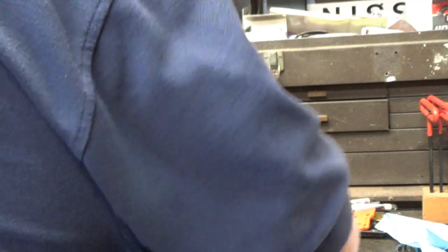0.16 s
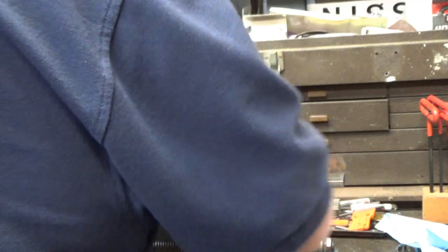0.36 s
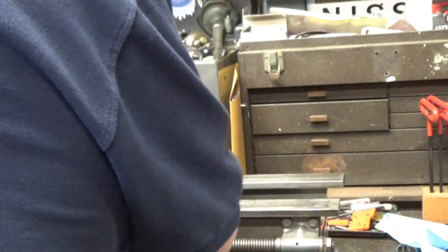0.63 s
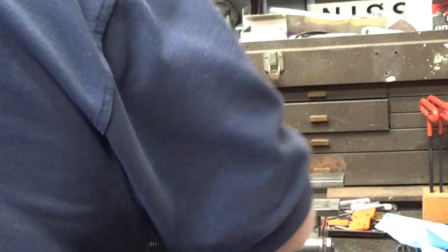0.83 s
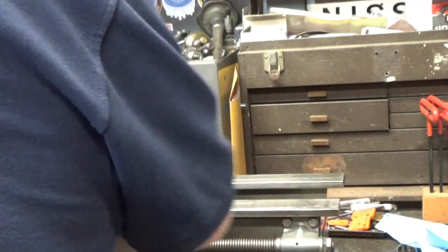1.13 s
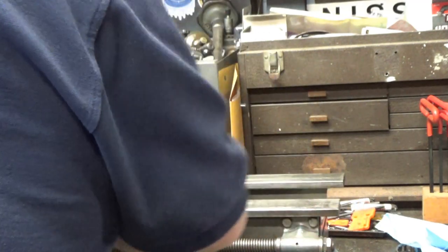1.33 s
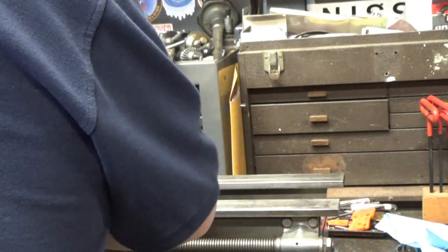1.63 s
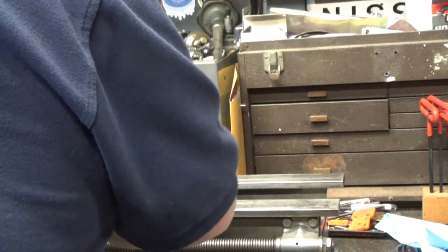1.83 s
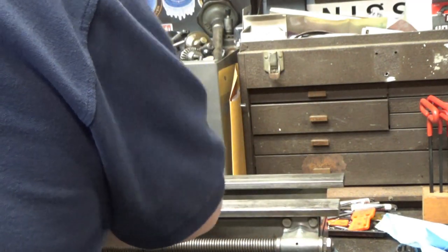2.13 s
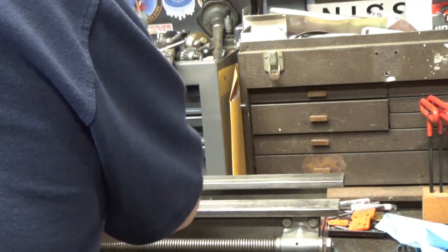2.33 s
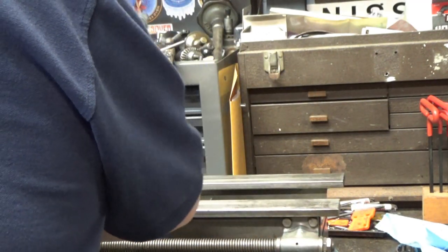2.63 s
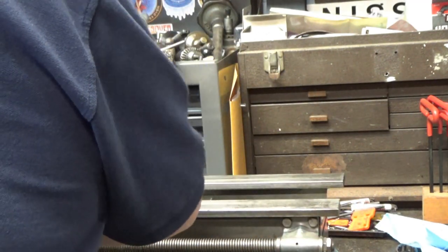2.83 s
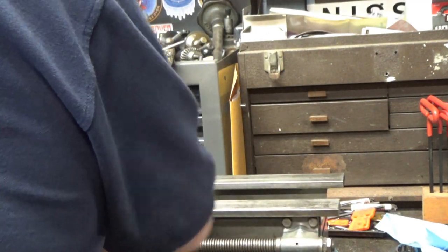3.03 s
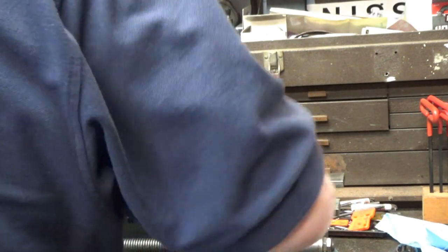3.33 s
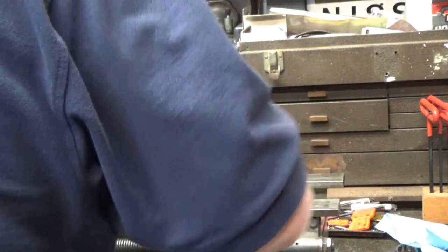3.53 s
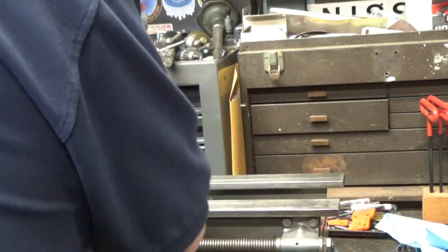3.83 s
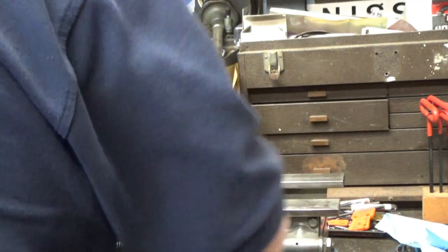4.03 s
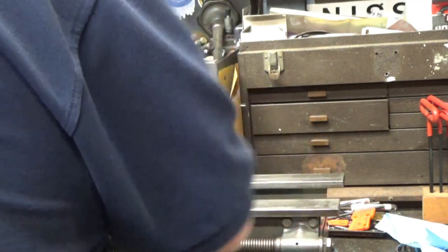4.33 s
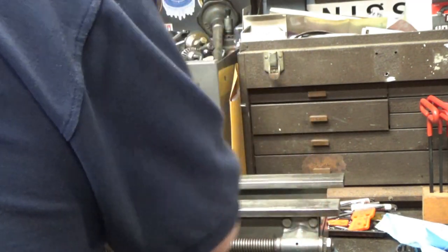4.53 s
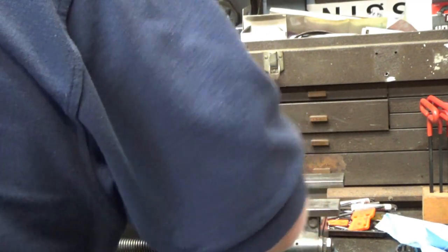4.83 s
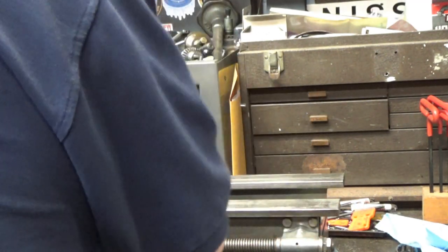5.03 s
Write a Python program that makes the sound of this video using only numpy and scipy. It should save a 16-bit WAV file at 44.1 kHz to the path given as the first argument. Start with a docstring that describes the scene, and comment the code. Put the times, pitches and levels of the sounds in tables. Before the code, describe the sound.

Gritty, bright scraping of stone on iron in a small workshop, to-and-fro strokes changing length, with one clattering knock early on.

```python
"""In a small workshop, a sharpening stone is rubbed to and fro along a cast-iron lathe bed.
Random grain clicks make the rasp, louder the faster each stroke goes. Resonances swell and slide with
the stone's place: they glide in long strokes and nearly hold still in short quick ones.
Filtered bursts make harsh catches and faint groans; one hard knock sets off decaying bed modes and clatter.
Room reflections and a steady hush of filtered noise lie behind."""
import sys
import numpy as np
from scipy import signal
from scipy.fft import rfft, irfft, next_fast_len
from scipy.io import wavfile

SR = 44100
rng = np.random.default_rng(int(sys.argv[2]) if len(sys.argv) > 2 else 0)


def transcribe(u):
    """Save the signal u as a 16-bit wav file named by the first command-line argument.

    u: samples, shape (n,) or (channels, n), limited to [-1, 1]; the rate is SR.
    q: integer samples, one column per channel.
    """
    v = np.clip(np.atleast_2d(u).T, -1, 1)
    q = np.round(v * 32767).astype(np.int16)
    wavfile.write(sys.argv[1], SR, q)


N = 228261  # length [samples]


def gain_of(db):
    """Decibels to gain."""
    return 10 ** (np.asarray(db) / 20)


def evened(x):
    """Scales to rms 1."""
    return x / np.sqrt(np.mean(x ** 2) + 1e-20)


def read(points, hz):
    """Reads a table on a log-frequency axis."""
    f, value = np.transpose(points)
    return np.interp(np.log(hz + 1), np.log(f + 1), value)


def add(mix, start_s, sound):
    """Mixes a sound in at its start time."""
    part = mix[max(round(start_s * SR), 0):][:len(sound)]
    part += sound[:len(part)]


def colour(x, points):
    """Filters by a spectrum of (frequency [Hz], gain [dB])."""
    size = next_fast_len(len(x) + 4096)
    gains = gain_of(read(points, np.fft.rfftfreq(size, 1 / SR)))
    return irfft(rfft(x, size) * gains, size)[:len(x)]


def resonate(x, hz, width):
    """A resonance of gain 1 that follows the curve hz, applied twice for steep skirts."""
    turn = np.exp(2j * np.pi * np.cumsum(hz * np.ones(len(x))) / SR)
    r = np.exp(-np.pi * width / SR)
    # shift the moving centre down to 0 Hz, low-pass there, shift back up
    smoothed = signal.lfilter([(1 - r) ** 2], [1, -2 * r, r * r], x / turn + 1e-18)
    return 2 * (turn * smoothed).real


def dying(t60s):
    """Dense random reflections, each band dying at its own speed."""
    hz, t, bands = signal.stft(rng.standard_normal(SR // 2), SR, nperseg=256)
    decay = gain_of(-60 * t / read(t60s, hz)[:, None])
    return signal.istft(bands * decay, SR, nperseg=256)[1][:SR // 2]


# where the first stroke sets out: (time [s], place on the bed [cm])
FIRST_PLACE = (-0.19, 14.2)
# strokes, each from the last turn or hitch of the hand to the next: (end time [s], place reached [cm],
# level before the mix [dB], share of the stroke spent speeding up [0-1], treble [dB], bass [dB])
ARM_STROKES = [(0.264, 20.5, -37.5, 0.73, -1.5, 1), (0.672, 6.5, -39.5, 0.39, 2.5, -5),
               (0.96, 14.5, -42.5, 0.64, 0.6, 1.9), (1.179, 4, -39.5, 0.69, -0.3, -0.1),
               (1.476, 6.5, -33.6, 0.063, -0.3, -9), (1.713, 4, -40.5, 0.7, -2.3, -1.6),
               (1.871, 2.5, -42.5, 0.54, -1.5, 1.0), (2.066, 3, -39, 0.47, -0.5, 0),
               (2.218, 0.4, -42, 0.52, -2, -1.5), (2.398, 1.5, -43, 0.44, 0, -2),
               (2.535, 1.2, -45, 0.56, -2, 0.2), (2.689, 1.7, -48.5, 0.49, 1.5, 0),
               (2.826, 1.0, -47.5, 0.65, -2.3, 1.5), (2.968, -0.2, -53, 0.33, -1, 2),
               (3.141, 2, -38.5, 0.92, -1, -3.5), (3.472, 17, -38.5, 0.26, 2.5, -3),
               (3.881, 0.5, -36, 0.63, -1.8, -6), (4.203, 15, -41.5, 0.47, 3, 0.1),
               (4.515, 4.5, -38.5, 0.51, 0.8, -3.5), (4.835, 16.5, -39, 0.62, 3.4, -1.1),
               (5.121, 3, -38.5, 0.59, 1.3, -3), (5.3, 10, -43.5, 0.34, -0.0, -2)]
LEFT_AT_TURN = 0.16  # share of the rasp left at a turn
BITE_CM_PER_S = 57  # above this speed the grit gets little louder


def motion(lead_s=0.0056):
    """The arm's swing: place on the bed (cm), loudness of the rubbing (gain), its treble and bass (dB)."""
    end, reached, db, rise, treble, bass = np.transpose(ARM_STROKES)
    t = np.arange(N) / SR + lead_s
    turns = np.r_[FIRST_PLACE[0], end]
    places = np.r_[FIRST_PLACE[1], reached]
    lengths = np.diff(turns)
    fastest = turns[:-1] + lengths * np.clip(rise, .05, .95)
    # half a step from turn to fastest moment, half a step on to the next turn
    marks = np.sort(np.r_[turns, fastest])
    stroke, part = np.divmod(np.interp(t, marks, np.arange(len(marks)) / 2), 1)
    place = np.interp(stroke + (1 - np.cos(np.pi * part)) / 2, np.arange(len(turns)), places)
    peak_cm_per_s = np.pi / 2 * abs(np.diff(places)) / lengths
    top_speed = np.interp(t, fastest, peak_cm_per_s) / BITE_CM_PER_S + 1e-6
    bite = np.tanh(top_speed * np.sin(np.pi * part)) / np.tanh(top_speed)
    loudness = gain_of(np.interp(t, fastest, db)) * (LEFT_AT_TURN + (1 - LEFT_AT_TURN) * bite)
    return place, loudness, np.interp(t, fastest, treble), np.interp(t, fastest, bass)


def grit(per_s=5000, spread_db=1.5, judder_db=1.56, judder_hz=70):
    """Tiny fractures of abrasive grains, a few large, clumped by the judder of the hand."""
    sizes = gain_of(spread_db * np.minimum(rng.exponential(1, N), 5)) * rng.choice([-1, 1], N)
    clicks = sizes * (rng.random(N) < per_s / SR)
    slow = signal.butter(2, judder_hz, fs=SR, output="sos")
    judder = evened(signal.sosfilt(slow, rng.standard_normal(N)))
    return evened(clicks * gain_of(judder_db * judder))


# spectrum of stone scraping iron: (frequency [Hz], relative level per Hz [dB])
RASP_COLOUR = [(200, -35), (400, -19), (800, -9), (1300, -10.5), (1800, -1), (2900, 1), (4400, -0.5),
               (5400, -2), (6200, 5), (7000, 2), (8700, -0.5), (9600, -7.5), (11000, -9), (11800, -13),
               (12600, -7.5), (13600, -18.5), (16000, -18.5)]


def rasp(drive):
    """Broad scraping noise that follows the speed of the stroke, brighter or duller as the stone is held."""
    _, loudness, treble, bass = motion()
    hiss = evened(colour(drive, RASP_COLOUR))
    top = colour(hiss, [(5500, -40), (6400, -8), (7600, 0)])
    bottom = colour(hiss, [(2600, 0), (3300, -8), (4000, -40)])
    middle = hiss - top - bottom
    return loudness * (middle + top * gain_of(treble) + bottom * gain_of(bass))


# resonances of stone and bed, each singing around one place: (frequency there [Hz], slide [octaves/cm],
# place [cm], reach [cm], relative level [dB])
SINGING_PLACES = [(2274, 0.0023, 14, 0.73, 10.5), (2415, -0.11, 11, 3.43, 8), (2840, 0.043, 20, 3.6, 6),
                  (3300, -0.0094, 23.5, 3.4, 11), (3490, -0.1, 9, 1.6, 3.5), (3860, 0.0015, 2.5, 1.6, 5),
                  (3790, -0.1, 15.5, 2.25, 6.5), (4280, 0.021, 0.64, 0.87, 6.5),
                  (5260, 0.024, 11.5, 2.23, 9.5), (5890, -0.036, 16.5, 4, 0), (8900, -0.057, 18, 2.0, 1),
                  (9270, -0.032, 12.5, 3.2, 9.5)]
# filter width at 1 kHz [Hz], and the power of frequency by which it grows
WIDTH_HZ, WIDENING = 248, 0.7


def stone(hiss, stone_db=2.5):
    """The rasp excites resonances that swell, slide and fade as the stone passes their place on the bed."""
    out, place = np.zeros(N), motion()[0]
    for hz, slide, centre, reach, db in SINGING_PLACES:
        away = place - centre
        note = resonate(hiss, hz * 2 ** (slide * away), WIDTH_HZ * (hz / 1000) ** WIDENING)
        nearness = np.exp(-(away / reach) ** 2 / 2)
        out += gain_of(db + stone_db) * nearness * note
    return out


# modes of the iron bed: (frequency [Hz], relative level [dB])
BED_MODES = [(105, -4), (237, -7), (442, 19.5), (515, 20.5), (545, 15), (622, 4), (726, 11), (763, -16),
             (875, -12), (1244, -69), (1572, -6), (1830, -9.5), (2175, 17.5), (2272, 14.5), (2720, 12),
             (2915, 15.5), (3120, -2), (3500, -33), (3842, 1), (3975, 4), (4250, -9), (4930, 13),
             (5660, 17.5), (6020, 17), (6330, 6.5), (6700, -31), (7620, -30), (8390, 17.5), (8950, 6),
             (10800, 6.5), (12500, -0.5)]


def bed_ring(damping=0):
    """The iron's answer to a tap: high modes die sooner; a pressed stone adds damping in dB a second."""
    t, out = np.arange(SR // 2) / SR, np.zeros(SR // 2)
    for k, (hz, db) in enumerate(BED_MODES):
        t60 = .22 * (500 / hz) ** .2  # s, before the added damping
        level_db = db - (60 / t60 + damping) * t
        out += (-1) ** k * gain_of(level_db) * np.sin(2 * np.pi * hz * t)
    return out


def bed(hiss, ring_db=-8.0):
    """The bed rings under the rasp, damped by the stone."""
    ring = signal.fftconvolve(hiss, bed_ring(damping=1100))[:N]
    return gain_of(ring_db) * np.std(hiss) * evened(ring)


# spectrum of the clatter: (frequency [Hz], relative level per Hz [dB])
CLATTER_COLOUR = [(40, -50), (65, -38), (105, 1.5), (170, -8.5), (240, -3), (380, -6.5), (460, 5),
                  (760, 5.5), (1100, -1), (2500, -2.5), (4500, -5.5), (9200, -2), (10300, -9), (12700, -13),
                  (15000, -24)]
# decay of the clatter: (frequency [Hz], time to fall 60 dB [s])
CLATTER_T60 = [(100, 0.34), (250, 0.5), (600, 0.25), (2000, 0.33), (6000, 0.32), (12000, 0.09)]


def clatter():
    """The dense ringing of machine and room after a blow, at rms 1 over its first 20 ms."""
    sound = colour(dying(CLATTER_T60), CLATTER_COLOUR)
    sound = sound * (1 - np.exp(-np.arange(len(sound)) / SR / .0008))  # soft onset
    sound = signal.sosfilt(signal.butter(2, 70, "high", fs=SR, output="sos"), sound)
    return sound / np.std(sound[:SR // 50])


# the stone strikes the bed: (time [s], level of the clatter [dB])
BLOW = (1.22, -18.5)


def knock(ring_db=-6, width_db=-3):
    """One hard blow sets off the bed's modes and a diffuse clatter: mid and side."""
    mid, side, ring = np.zeros(N), np.zeros(N), bed_ring()
    ring = ring / np.std(ring[:SR // 50])
    start_s, level_db = BLOW
    add(mid, start_s, gain_of(level_db) * (clatter() + gain_of(ring_db) * ring))
    add(side, start_s, gain_of(level_db + width_db) * clatter())
    return mid, side


# the stone's edge catches: (time [s], length [s], level before the mix [dB], first frequency [Hz],
# last frequency [Hz], filter width [Hz])
EDGE_CATCHES = [(0.0, 0.22, -42.5, 2000, 3300, 700), (0.484, 0.13, -48.5, 8850, 7850, 4500),
                (0.628, 0.02, -56, 680, 660, 1100), (1.156, 0.062, -51.5, 1860, 1860, 1200),
                (3.135, 0.043, -32, 2700, 2700, 3420), (3.138, 0.047, -36.5, 6600, 6400, 4560),
                (3.136, 0.16, -39.5, 1580, 5900, 900), (3.303, 0.12, -44, 3980, 2080, 1020),
                (3.543, 0.13, -38.5, 8170, 9300, 1300), (3.69, 0.017, -53, 3070, 3070, 1500),
                (3.745, 0.16, -46, 4000, 3850, 280), (4.331, 0.06, -44, 2400, 3200, 1100),
                (4.487, 0.019, -55, 600, 615, 1200), (4.636, 0.021, -44, 3200, 3220, 1550)]


def catches(drive):
    """Harsh scrapes where an edge digs in: bursts of grit through a resonance, most sliding in pitch."""
    out, thin = np.zeros(N), colour(drive, [(250, -42), (750, 17)])
    for start_s, length_s, db, first_hz, last_hz, width in EDGE_CATCHES:
        part = thin[max(round(start_s * SR), 0):][:round(length_s * SR)]
        burst = resonate(part, np.linspace(first_hz, last_hz, len(part)), width)
        add(out, start_s, gain_of(db) * evened(burst * signal.windows.tukey(len(part), .7)))
    return out


# the stone groans faintly where it drags: (start time [s], end time [s], first frequency [Hz],
# last frequency [Hz], level before the mix [dB])
DRAG_GROANS = [(0.127, 0.29, 1000, 780, -55), (1.454, 1.688, 1510, 950, -61.5),
               (1.815, 1.98, 1170, 1170, -58.5), (1.994, 2.225, 820, 730, -60),
               (2.15, 2.68, 880, 870, -59.5), (3.518, 3.626, 510, 503, -59), (4.138, 4.335, 390, 990, -60),
               (4.628, 4.94, 1090, 565, -58)]


def groans(drive, width_hz=260, follow=0.36):
    """Low, narrow notes of the dragging stone; each swells and weakens with the loudness of the rubbing."""
    out, drive = np.zeros(N), drive * motion()[1] ** follow
    for start, end, first_hz, last_hz, db in DRAG_GROANS:
        part = drive[round(start * SR):round(end * SR)]
        note = resonate(part, np.linspace(first_hz, last_hz, len(part)), width_hz)
        add(out, start, gain_of(db) * evened(note * signal.windows.tukey(len(part), .6)))
    return out


# decay of the workshop: (frequency [Hz], time to fall 60 dB [s])
WORKSHOP_T60 = [(200, 0.26), (1000, 0.22), (5000, 0.11), (12000, 0.09)]


def room(x, travel_hz=1.306):
    """Reflections of the small workshop; a steady to-and-fro cycle shifts between two random patterns."""
    angle = 2 * np.pi * travel_hz * np.arange(N) / SR
    tails = [dying(WORKSHOP_T60) for _ in range(2)]
    out = np.zeros(N)
    for share, tail in zip([np.cos(angle), np.sin(angle)], tails):
        out += signal.fftconvolve(x * share, tail / np.linalg.norm(tail))[:N]
    return out


# spectrum of the hush: (frequency [Hz], relative level per Hz [dB])
AIR_COLOUR = [(12, -44), (20, -4.5), (59, -0.5), (110, -1.5), (166, -4), (300, -5), (900, -6), (1400, -7.5),
              (3000, -8), (8000, -42), (15000, -70)]


def air(air_db=-58.5):
    """The steady hush of the workshop: filtered noise."""
    return gain_of(air_db) * evened(colour(rng.standard_normal(N), AIR_COLOUR))


# stereo width of reflections and knock: (frequency [Hz], gain of the side signal [dB])
SIDE_COLOUR = [(30, -44), (120, -23), (500, -14), (1000, -12), (2000, -12), (5000, -11), (8000, -11.5),
               (12000, -37)]
# stereo width of the hush: (frequency [Hz], side over mid [dB])
AIR_SIDE_COLOUR = [(30, -34), (60, -27), (120, -15), (200, -8), (400, -2.5), (1300, -3.5)]


def scene(direct_db=-3, room_db=-3, rasp_db=-1.0):
    """The worker's body screens the stone, so much arrives by the walls; left and right differ a little."""
    drive = grit()
    hiss = rasp(drive)
    ring = bed(hiss)
    rub = gain_of(rasp_db) * hiss + stone(rasp(grit())) + groans(grit()) + catches(drive)
    blow, blow_side = knock()
    mid = gain_of(direct_db) * rub + gain_of(room_db) * room(rub) + ring + blow + air()
    side = colour(room(rub + ring) + blow_side, SIDE_COLOUR) + colour(air(), AIR_SIDE_COLOUR)
    return np.array([mid + side, mid - side])


def record(dry, balance_db=-0.2, edge_hz=15800):
    """A slight lean to the right, then a steep low-pass that limits the band."""
    leaning = dry * gain_of([[balance_db], [-balance_db]])
    low_pass = signal.firwin(511, edge_hz, window=("kaiser", 9), fs=SR)
    return signal.oaconvolve(leaning, low_pass[None], "same")


dry = scene()
out = record(dry)
transcribe(out)
```